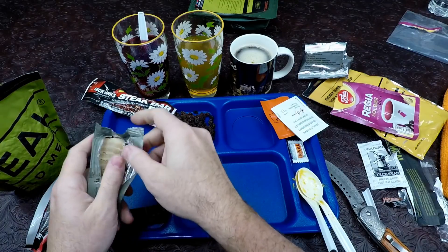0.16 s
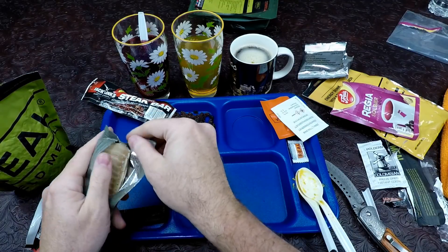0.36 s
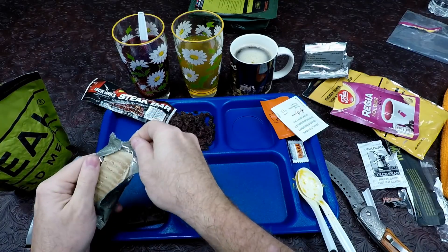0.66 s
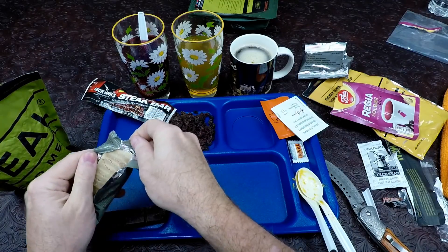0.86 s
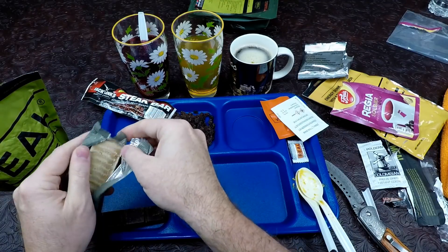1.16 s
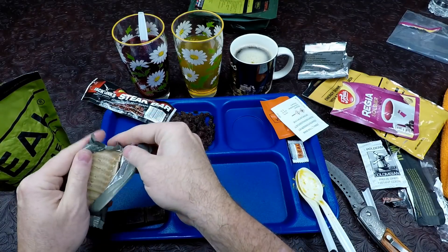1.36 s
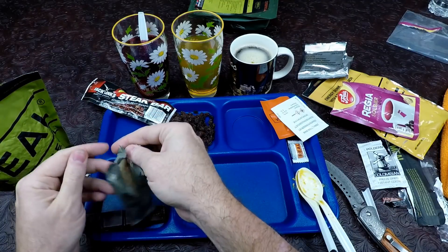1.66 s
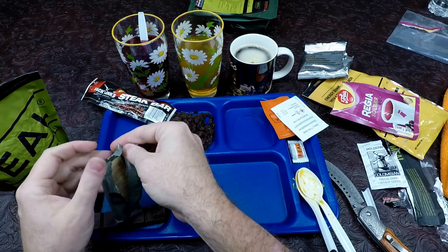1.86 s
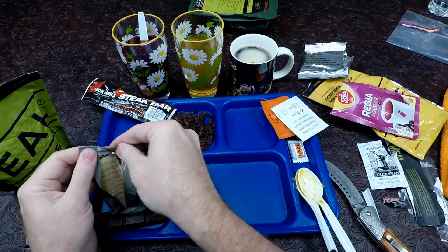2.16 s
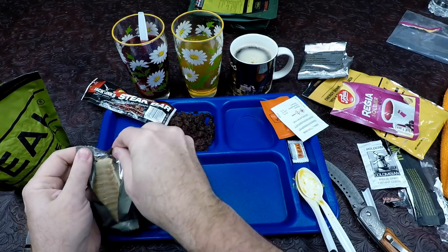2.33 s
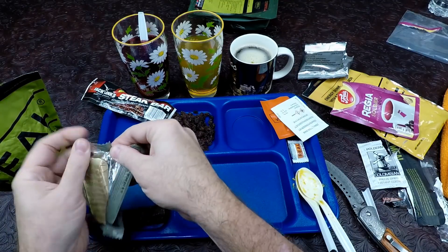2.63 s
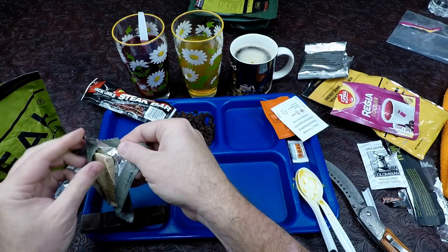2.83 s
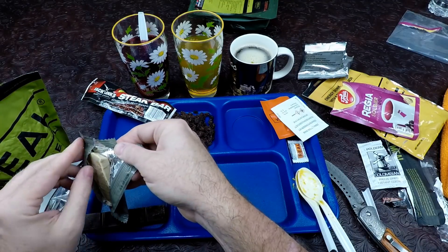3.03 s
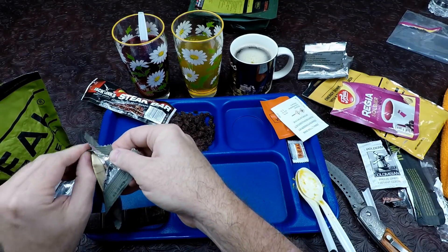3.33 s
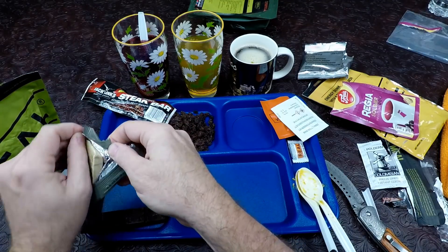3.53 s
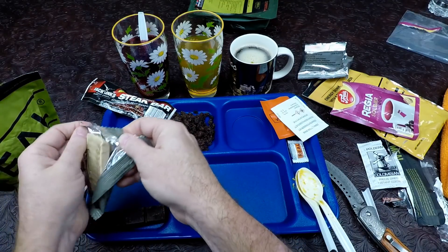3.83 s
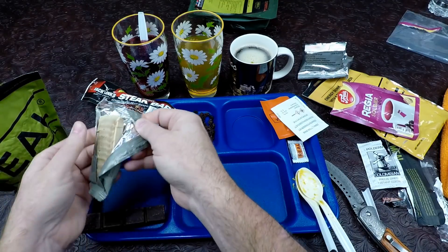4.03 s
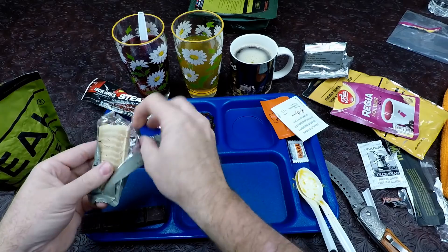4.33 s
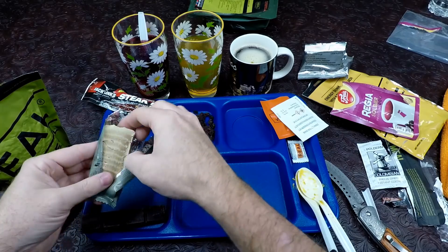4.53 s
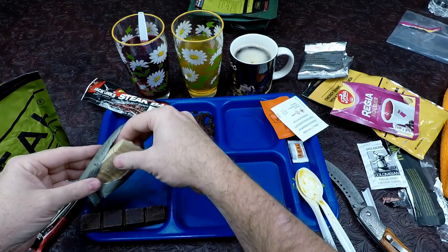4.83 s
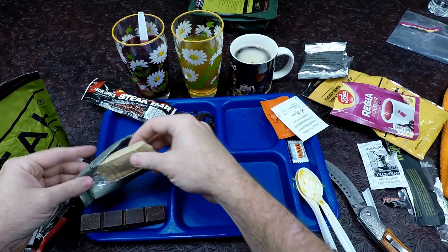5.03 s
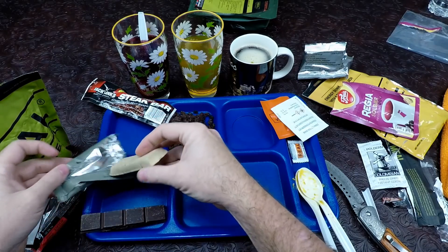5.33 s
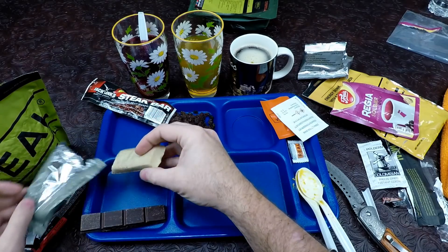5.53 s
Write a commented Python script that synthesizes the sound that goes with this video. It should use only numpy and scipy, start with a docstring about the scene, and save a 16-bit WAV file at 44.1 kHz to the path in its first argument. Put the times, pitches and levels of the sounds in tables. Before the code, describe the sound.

Stiff foil-lined wrapper crinkles and snaps close by in irregular bursts, then a dry cracker scrapes out, in a quiet small room.

```python
"""A small room: two hands peel a stiff foil wrapper off a cracker.
Creases snap in short noise bursts, split into four bands for pouch, panel, crack and sheen.
Each pull of the fingers swells fine crackle and duller flexing, both made of tiny noise grains.
Near the end the cracker slides out with a bright scraping hiss.
Decaying noise tails give the room's brief answer; wavering sines and filtered noise make hum and air."""
import sys
import numpy as np
from scipy import signal
from scipy.fft import rfft, irfft, next_fast_len
from scipy.io import wavfile
from scipy.ndimage import uniform_filter1d, map_coordinates

SR = 44100
rng = np.random.default_rng(int(sys.argv[2]) if len(sys.argv) > 2 else 0)


def dump(signal):
    """Clip the signal to [-1, 1] and save it as 16-bit WAV at the path in sys.argv[1]."""
    limited = np.clip(np.atleast_2d(signal).T, -1, 1)
    pcm = np.round(limited * 32767).astype(np.int16)
    wavfile.write(sys.argv[1], SR, pcm)


N = 250471  # length [samples]


def amp(db):
    """Gain for a level in dB."""
    return 10 ** (np.asarray(db) / 20)


def unit(x):
    """Each row scaled to rms 1."""
    return x / np.sqrt(np.mean(x ** 2, axis=-1, keepdims=True) + 1e-20)


def along(points, hz):
    """Read a (frequency, value) curve on a log frequency axis."""
    f, v = np.transpose(points)
    return np.interp(np.log(hz + 1), np.log(f + 1), v)


def wobble(rate):
    """A smooth random curve with this many knots a second."""
    knots = rng.standard_normal(int(N * rate / SR) + 4)
    return map_coordinates(knots, [np.arange(N) * rate / SR])


def colour(x, spectrum, size=2048):
    """Rows of x through a minimum-phase filter, so the colour adds no sound ahead of an attack."""
    log_gain = np.log(amp(along(spectrum, np.fft.rfftfreq(size, 1 / SR))))
    # folding the cepstrum onto positive time makes the filter causal
    cepstrum = irfft(log_gain)
    cepstrum[1:size // 2] *= 2
    cepstrum[size // 2 + 1:] = 0
    kernel = irfft(np.exp(rfft(cepstrum)))
    filtered = signal.fftconvolve(np.atleast_2d(x), kernel[None], axes=1)
    return filtered[:, :x.shape[-1]].reshape(x.shape)


def resonate(x, hz, q):
    """Each row of x through one resonance at its own frequency."""
    f = np.fft.rfftfreq(x.shape[-1], 1 / SR)
    response = 1 / (1 + 1j * q * (f / hz - hz / (f + 1)))
    return irfft(rfft(x) * response, x.shape[-1])


RUB = 0.15  # smooth rubbing between the grains, against their evened-out mean power of 1


def grains(spectrum, rate, life, spread_db):
    """Tiny buckles of random size at random moments (rate per s, life in s), over smooth rubbing."""
    sizes = amp(spread_db * np.clip(rng.standard_normal(N), -2, 2))
    strikes = sizes * (rng.random(N) < rate / SR)
    power = signal.lfilter([1], [1, -np.exp(-2 / (life * SR))], strikes ** 2)
    # even out the slow swells, keep the ticks
    power /= np.abs(uniform_filter1d(power, size=2400)) + 1e-9
    return colour(np.sqrt(power + RUB) * rng.standard_normal(N), spectrum)


# mains hum and other steady room tones: (frequency [Hz], level [dB rms])
HUM_TONES = [(119.9, -65.5), (140.6, -75), (174.4, -69.5), (233.7, -71.5), (359.9, -74.5), (403.7, -79)]
# colour of the room's air and hiss: (frequency [Hz], relative density [dB per Hz])
AIR_COLOUR = [(20, 1.5), (80, -6), (170, 3.5), (300, -4), (500, -12.5), (630, -5.5), (1200, -16.5),
              (3000, -15), (8700, -20.5), (10700, -27), (15300, -29)]


def background(air_db=-60.5, waver=0.0011):
    """Filtered noise for air, and sines whose phase wavers more the higher they are (radians per Hz)."""
    t = np.arange(N) / SR
    hum = 0
    for hz, db in HUM_TONES:
        phase = 2 * np.pi * hz * t + waver * hz * wobble(9)
        hum = hum + amp(db) * np.sqrt(2) * np.sin(phase)
    air = unit(colour(rng.standard_normal(N), AIR_COLOUR, size=8192))
    return hum + amp(air_db) * air


# each pull or squeeze of the fingers, timed from full grip:
# (time [s], hold [s], effort [dB], flexing gain [dB])
FINGER_PULLS = [(-.02, 0.51, -50, -19.5), (0.564, 0.046, -43.5, -19.5), (0.645, 0.059, -48.5, -19),
                (0.701, 0.043, -43, -22), (0.809, 0.16, -54, -21), (1.081, 0.34, -54, -23),
                (1.51, 0.099, -51, -27), (1.605, 0.12, -43.5, -18), (1.817, 0.036, -48, -25),
                (1.907, .14, -61, -24.5), (2.159, .25, -49.5, -20.5), (2.437, 0.18, -48.5, -21),
                (2.672, .11, -55, -21.5), (3.014, 0.086, -69, -13), (3.28, 0.32, -66.5, -25),
                (3.507, 0.33, -51, -25), (3.79, 0.21, -48.5, -22.5), (4.029, 0.087, -51, -21),
                (4.2, 0.17, -54, -28.5), (4.36, 0.16, -53, -17), (4.59, 0.33, -63, -20),
                (5.09, 0.22, -60.5, -15), (5.445, 0.076, -66, -17)]
GRIP_S, RELAX_S = 0.016, 0.043  # straight build-up before full grip, decay time constant after the hold
EFFORT_WAVER_DB = 1.5  # unsteadiness of the fingers
FLEX_GROWTH = 0.76  # flexing grows with this power of the effort


def effort():
    """Gains for crackle and flexing: each pull builds up, holds unsteadily and relaxes."""
    t = np.arange(N) / SR
    s, hold, effort_db, flex_db = np.transpose(FINGER_PULLS)[:, :, None]
    grip = np.clip((t - s) / GRIP_S + 1, 0, 1)
    relax = np.exp(-np.maximum(t - s - hold, 0) / RELAX_S)
    pulls = amp(effort_db) * grip * relax * amp(EFFORT_WAVER_DB * wobble(12))
    # overlapping pulls add as powers
    force = np.linalg.norm(pulls, axis=0)
    flex = np.linalg.norm(amp(flex_db) * pulls ** FLEX_GROWTH, axis=0)
    return force, flex


# colour of the fine crackle: (frequency [Hz], relative density [dB per Hz])
CRACKLE_COLOUR = [(600, -40), (1300, 0), (2200, 4.5), (2850, 4), (3300, 0), (4500, 3.5), (6500, -2.5),
                  (8600, 4), (10800, -6.5), (15000, -11.5), (16000, -15.5)]
# colour of the flexing pouch: (frequency [Hz], relative density [dB per Hz])
FLEX_COLOUR = [(150, -19.5), (350, -1), (520, -7), (720, 1.5), (1150, 2.5), (1700, -4), (4000, -63)]


def crinkle(force, flex, focus_db=10):
    """Moving fingers set off fine crackle and the duller flexing of the pouch."""
    crackle = np.zeros(N)
    # wrinkles of four sizes, each fading by focus_db per octave away from its own pitch
    for pitch in (1700, 3400, 6800, 13600):
        spectrum = [(hz, db - focus_db * abs(np.log2(hz / pitch))) for hz, db in CRACKLE_COLOUR]
        crackle += grains(spectrum, rate=80, life=0.0018, spread_db=2.5)
    flexing = grains(FLEX_COLOUR, rate=100, life=0.0042, spread_db=2.0)
    return force * unit(crackle) + flex * unit(flexing)


# lesser snaps, one row each for crack over effort, then pouch, panel and sheen over crack:
# (mean level [dB], scatter [dB])
SMALL_SNAP_LEVELS = [(4.5, 2), (-12, 6), (-5, 5), (-2, 3)]
SMALL_SNAPS_PER_S, SMALL_RING_S = 28, 0.0097  # rate, t60


def small_snaps(force):
    """Lesser creases give way at random moments, as strongly as the fingers pull; rows as in BIG_SNAPS."""
    slots = np.arange(int(N / SR * SMALL_SNAPS_PER_S))
    s = (slots + rng.random(len(slots))) / SMALL_SNAPS_PER_S
    mean, scatter = np.transpose(SMALL_SNAP_LEVELS)
    luck = np.clip(rng.standard_normal((len(s), len(mean))), -1.5, 1.5)
    crack, pouch, panel, sheen = (mean + scatter * luck).T
    effort_db = 20 * np.log10(force[(s * SR).astype(int)] + 1e-9)
    ring = np.full(len(s), SMALL_RING_S)
    return np.column_stack([s, effort_db + crack, pouch, panel, sheen, ring])


# the creases that stand out, and how much each shakes the other parts of the foil:
# (time [s], crack level [dB], pouch over crack [dB], panel over crack [dB], sheen over crack [dB],
#  ring t60 [s])
BIG_SNAPS = [(.0543, -43, -8, -16, 2, 0.063), (0.076, -40.5, -5.5, -10, -7, 0.023),
             (.1125, -45, -11, -1, -11, .05), (0.1405, -37.5, -11.5, -6, -1, 0.0085),
             (0.2276, -41, -6, -1, 3.5, 0.068), (.2722, -45, -18, 5, 2, .018),
             (0.2794, -38.5, -29, -4, -1, 0.012), (0.3125, -38, -11, 0.5, -1, .011),
             (.324, -46.5, 6.5, -4, -7, 0.012), (0.3626, -38, -17, -2.5, -3, .016),
             (0.3943, -32, -18, -8.5, -6, 0.011), (.401, -34, -29, -9, -2, .022),
             (0.479, -41.5, -24, -24, 3.5, .012), (0.4853, -41.5, -24, -19, -1, .015),
             (.5043, -49, 7.5, -8, -10, 0.016), (.58, -36, -4, -7, 0, .015),
             (0.5901, -32.5, -13, -7, -2, 0.0069), (.5974, -35, -1, -7, -8, 0.019),
             (0.6436, -46.5, -9, -1, 7, .025), (.6747, -36, -29, -8, 2.5, 0.011),
             (0.7042, -35, -22, -7, 5.5, .023), (0.7341, -30, -21, -14, -3.5, 0.015),
             (.7596, -41.5, -8, -7, 1, .025), (0.7722, -49, 4, -1, 3, 0.0079),
             (0.8464, -47.5, -18, -2, -5, 0.014), (0.8826, -42.5, -5, 0.5, -9, 0.014),
             (0.8906, -46, -10, -1, 5.5, 0.01), (0.9065, -38.5, -7, 0.5, 0.5, .028),
             (.9235, -39, -15, -9, 1.5, 0.0088), (1.1122, -42, -11, -17, 0, 0.014),
             (1.1435, -37, -7.5, -7, -2, 0.029), (1.208, -44.5, -21, -12, -0.5, 0.022),
             (1.2138, -45.5, -18, -2, -1, .023), (1.2584, -46, -10, -14, 0, .018),
             (1.289, -47.5, -9, -16, 8.5, 0.012), (1.317, -42.5, -13, -4.5, 4, 0.015),
             (1.3562, -45, -5, 0.5, 3, 0.026), (1.3728, -36.5, -19, -18, -5, .01),
             (1.4104, -43, -10, -3, 2.5, 0.02), (1.4862, -28.5, -16, -13, -3.5, 0.015),
             (1.4954, -32.5, -23, -7, 5.5, 0.027), (1.57, -49.5, -6, 13, 13.5, 0.0056),
             (1.6125, -34.5, -6, -10, 0, 0.044), (1.6261, -34, -16, -6.5, 3, 0.031),
             (1.6355, -33.5, -8, -7, 3.5, .01), (1.6545, -27.5, -6, -9, -2.5, 0.025),
             (1.6992, -33.5, -11, -5, -3, 0.014), (1.7098, -34, -28, -20, 4, 0.032),
             (1.7256, -33, -10, -3.5, 0, 0.045), (1.7469, -28.5, -20, -13, -3, 0.021),
             (1.8054, -26.5, -15.5, -13, -2, 0.023), (1.8241, -39, -13, -4.5, 3, .014),
             (1.8454, -38, -19, -17, -3, .017), (1.9641, -42, -13, -12, -3.5, .014),
             (2.1457, -36.5, -30, -9.5, -5, 0.024), (2.159, -38.5, -22, -5, 3.5, 0.036),
             (2.2173, -40.5, -9.5, -0.5, -0.5, .012), (2.2515, -36.5, -27, -9, 1, 0.024),
             (2.3186, -29.5, -18.5, -11, -3.5, .021), (2.323, -33.5, -37, -12, 3.5, .018),
             (2.3839, -40.5, -15, -1, -1.5, 0.022), (2.4282, -33.5, -6, -2, -5, 0.011),
             (2.4465, -32.5, -14, -3.5, -4.5, 0.026), (2.488, -40.5, -4, 2.5, 2, 0.022),
             (2.5104, -33, -28, 4.5, -5, .007), (2.5154, -30, -8, -4, 0, 0.013),
             (2.5615, -51.5, 3, 16.5, -8, .006), (2.5919, -41, -14, 4.5, -3, 0.007),
             (2.6197, -45.5, 2.5, -4, -13, 0.0097), (2.6326, -40.5, -20, -6, 0, 0.019),
             (2.6735, -35, -10, -2.5, -2, 0.044), (2.7155, -34, -17, -6, -9.5, 0.023),
             (2.8128, -41.5, -24, -11, -2, 0.03), (2.8745, -50, -5, 1, -12, 0.019),
             (2.9377, -33.5, -21.5, -7.5, -0.5, 0.011), (3.013, -43.5, 7, 0, -6.5, 0.016),
             (3.136, -55.5, -4, -8, -5, .017), (3.2212, -47, -12.5, -10.5, 0, 0.014),
             (3.349, -46, -18, -5, -4, 0.0094), (3.4805, -39, -15, -8, -2.5, 0.034),
             (3.5101, -31.5, -22, -9, -0.5, .014), (3.5327, -37, -26, -2.5, -4, 0.0071),
             (3.5772, -37, -15, -3, -1, 0.034), (3.618, -37, -16, -4.5, 2, 0.016),
             (3.626, -32, -35, -15, -2, 0.012), (3.678, -35, -30, -1.5, 0.5, .014),
             (3.6882, -33, -15, -11, -6, 0.02), (3.7184, -41, -11, -1, -1, 0.018),
             (3.7861, -30.5, -19, -13, -15, .009), (3.8055, -33.5, -19, -4, 0.5, .01),
             (3.81, -38, -13, 0, 4.5, 0.042), (3.8204, -37.5, -7.5, -4, -1, 0.045),
             (3.8335, -35.5, -23, 4, -3, 0.0093), (3.8624, -32.5, -13, -2, -3, 0.017),
             (3.905, -38.5, -47, 3, 1, 0.0073), (3.9392, -30, -9.5, -11, -2.5, 0.0088),
             (3.9522, -38, -13, 4, 0, 0.0087), (3.9764, -45.5, -4, 4, 5, 0.026),
             (4.0488, -39.5, -3.5, -4, -1, .023), (4.089, -29.5, -15.5, -16, -2.5, 0.012),
             (4.098, -36, -27, -4, -12, 0.0052), (4.1193, -42, -4, 1, 11, .014),
             (4.1356, -35, -15, -12, -4, 0.013), (4.217, -46.5, -23, -13, 1, .015),
             (4.2378, -48, -22, -4, 5, .007), (4.2865, -47, -4, 3, -6, 0.023),
             (4.324, -45.5, -5, -8, 3, 0.021), (4.3473, -50, -20, 2, 10, 0.0048),
             (4.384, -48.5, -23, 2, 11, 0.0039), (4.4005, -39, -19, -4, 3.5, 0.0062),
             (4.413, -40.5, -11, -4, 4, 0.047), (4.4518, -50.5, 6.5, 0, 7, 0.027),
             (4.5098, -43, -20, -5, 2, .021), (4.529, -50, 1.5, 0, 1, 0.016),
             (4.608, -50, -25, -10, 0.5, 0.0099), (4.6873, -47.5, -21, -12, 1.5, .021),
             (4.723, -45, -13, -5.5, -7, 0.012), (4.786, -52.5, -14, -15, 7.5, .011),
             (4.8368, -44, -13, -6, -4, 0.0083), (4.847, -47.5, 6.5, 0.5, 8, 0.024),
             (5.027, -49, -4, 0.5, -7, 0.048), (5.0768, -36, -22, -8.5, -3, .006),
             (5.082, -40.5, -23, 0, -0.5, 0.013), (5.1172, -40, -21, -0.5, -1.5, .007),
             (5.2257, -39, -13.5, -5, -7, .027), (5.2382, -45.5, -9, 1, 3, 0.031),
             (5.2577, -41, -12, -3, -3, 0.062)]
# what rings in a snap, in rows of pouch, panel, crack and sheen: (low edge [Hz], high edge [Hz])
FOIL_PARTS = [(380, 1300), (1300, 3000), (3000, 6000), (6000, 16000)]
# colour of the snaps: (frequency [Hz], relative density [dB per Hz])
SNAP_COLOUR = [(250, -28.5), (500, -11), (730, 0), (1200, -8), (2200, -7.5), (2900, -7), (3300, 2),
               (4400, 8.5), (6300, 2.5), (8600, 4.5), (10800, -5.5), (13500, -6), (15200, -13),
               (16000, -42)]
# centre pitch of a panel shaken as loud as the crack; sinks, then rises: (time [s], pitch [Hz])
PANEL_PITCH = [(0, 2310), (1.6, 1940), (2.6, 1940), (3.9, 2080), (5.2, 2500)]
PANEL_DB_PER_OCTAVE, PANEL_SCATTER_OCTAVES = 48, 0.031  # a harder-shaken panel is larger and pops lower
PANEL_PURITY_DB = 12  # a panel's resonance narrows by half for this much more shaking
LEVEL_SPAN_S = 0.005  # each part's level is the rms its energy would have over this span


def snaps(rows, jolt=5.9, rough=0.63, build=0.00016, panel_q=3.6, size=1000):
    """A crease gives way with one jolt and a dying run of rough ones, shaking four parts of the foil."""
    t = np.arange(size) / SR
    s, crack, pouch, panel, sheen, t60 = np.transpose(rows)[:, :, None]
    levels = [crack + pouch, crack + panel, crack, crack + sheen]
    tension = rng.standard_normal(s.shape)
    octaves = PANEL_SCATTER_OCTAVES * tension - panel / PANEL_DB_PER_OCTAVE
    panel_hz = np.interp(s, *np.transpose(PANEL_PITCH)) * 2 ** octaves

    # the buckle gathers speed as it runs along the crease
    draws = rng.standard_normal((len(s), 2, size))
    run = draws[:, 0] * np.exp(rough * draws[:, 1]) * (1 - np.exp(-t / build))
    run[:, 0] = jolt * np.sign(draws[:, 0, 0])
    shaken = colour(run * np.exp(-np.log(1000) * t / t60), SNAP_COLOUR)

    parts = []
    for band in FOIL_PARTS:
        band_filter = signal.butter(3, band, "band", fs=SR, output="sos")
        parts.append(signal.sosfilt(band_filter, shaken))
    # the flat panel beside the crease pops at a pitch set by its size and tension
    parts[1] = resonate(parts[1], panel_hz, panel_q * 2 ** (panel / PANEL_PURITY_DB))

    sound = sum(amp(db) * unit(part) for db, part in zip(levels, parts))
    sound = sound * np.sqrt(LEVEL_SPAN_S * SR / size)
    # lay every snap on the timeline, summing overlaps
    at = np.round(s * SR).astype(int) + np.arange(size)
    return np.bincount(at.ravel(), sound.ravel(), N)[:N]


# decay of the room: (frequency [Hz], t60 [s])
ROOM_DECAY = [(300, 0.06), (1200, 0.33), (4000, 0.34), (8000, 0.27), (14000, 0.14)]


def room(x, gap=0.0028, count=5):
    """The walls answer after a short gap (s), through several noise tails in turn as the hands move."""
    wet = np.zeros(N)
    place = (np.arange(N) / SR * 9 % count).astype(int)  # nine changes a second
    for k in range(count):
        hz, t, noise = signal.stft(rng.standard_normal(SR // 2), SR, nperseg=256)
        decay = np.exp(-np.log(1000) * t / along(ROOM_DECAY, hz)[:, None])
        tail = signal.istft(noise * decay, SR, nperseg=256)[1]
        tail *= 1 - np.exp(-(np.arange(len(tail)) / (gap * SR)) ** 2)
        wet += signal.fftconvolve(x * (place == k), tail / np.linalg.norm(tail))[:N]
    return wet


# the cracker sliding out along the foil: (time [s], level [dB])
SLIDE_LEVEL = [(4.94, -93), (5.0, -59), (5.2, -55), (5.28, -63), (5.34, -85)]
# colour of the scrape: (frequency [Hz], relative density [dB per Hz])
SCRAPE_COLOUR = [(800, -16), (3000, 2.5), (5000, -1), (9000, -4), (14500, -14), (16000, -25)]


def slide():
    """The dry cracker scrapes the lining: dense, very short grains blur into a fine, bright hiss."""
    level = np.interp(np.arange(N) / SR, *np.transpose(SLIDE_LEVEL), left=-np.inf, right=-np.inf)
    return amp(level) * unit(grains(SCRAPE_COLOUR, rate=1400, life=0.0007, spread_db=8.5))


# how strongly the walls answer, before the echo's overall gain: (frequency [Hz], level [dB])
WALL_COLOUR = [(600, 1), (4200, -2.5), (6700, 1.5), (9000, -2), (14000, 5)]


def scene(room_db=-13.5):
    """The wrapper close by, its echo and the room's own sound."""
    force, flex = effort()
    fine = crinkle(force, flex) + slide()
    creases = np.vstack([BIG_SNAPS, small_snaps(force)])
    # crumpled foil sends a different waveform each way: to the listener, the walls and the ceiling
    direct, sideways, upward = [snaps(creases) + fine for _ in range(3)]
    echo = colour(room(sideways) + room(upward), WALL_COLOUR)
    return (direct + amp(room_db) * echo + background())[None]


TOP_HZ = 15700


def record(dry):
    """A steep band limit: nothing is kept from TOP_HZ up."""
    m = next_fast_len(N + SR // 2)  # padded so the ends do not wrap round
    keep = np.fft.rfftfreq(m, 1 / SR) < TOP_HZ
    return irfft(rfft(dry, m) * keep, m)[..., :N]


dry = scene()
out = record(dry)
dump(out)
```